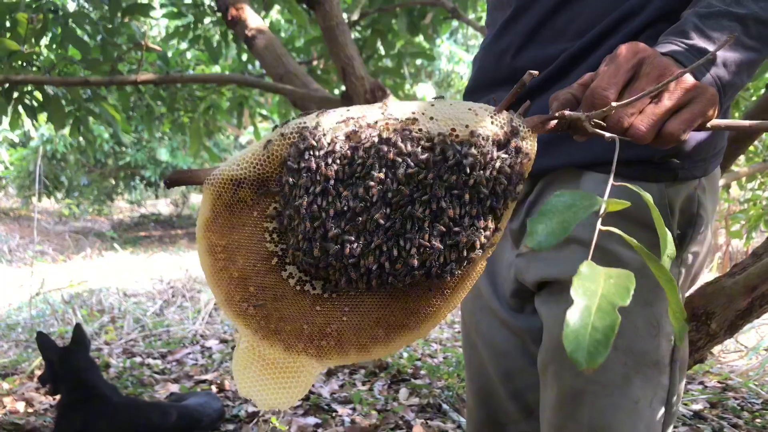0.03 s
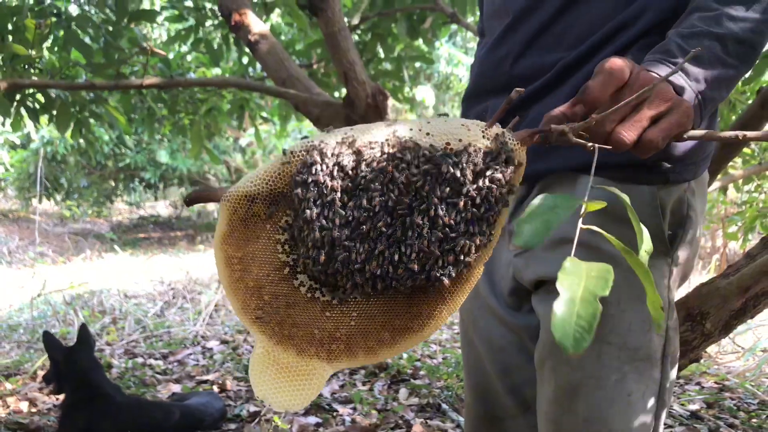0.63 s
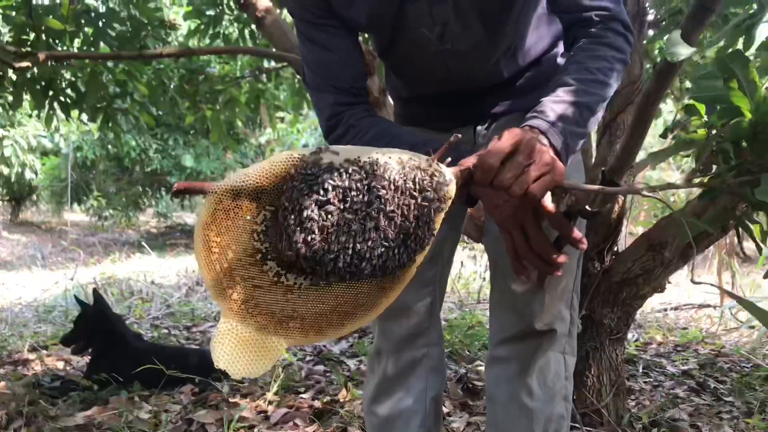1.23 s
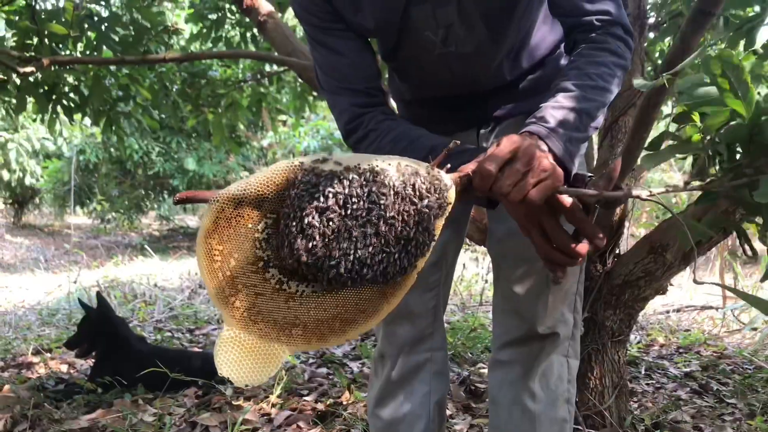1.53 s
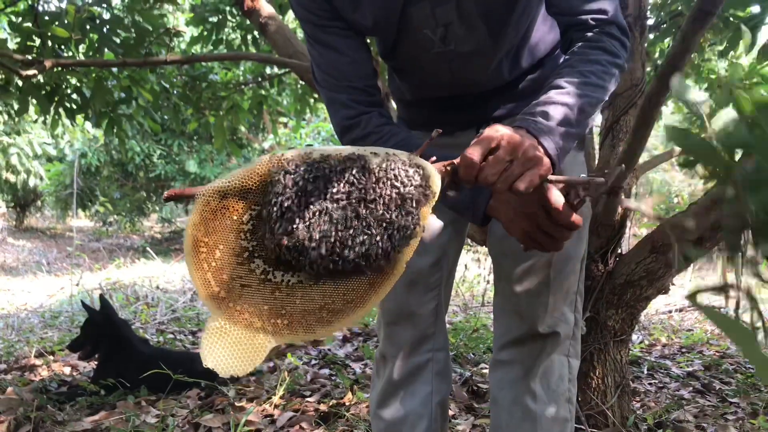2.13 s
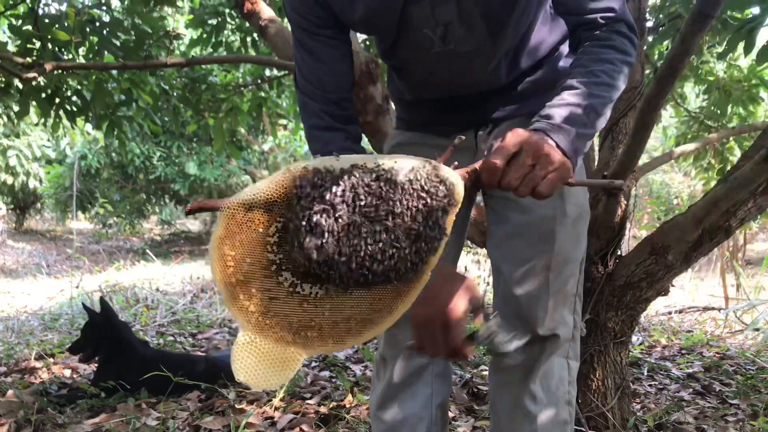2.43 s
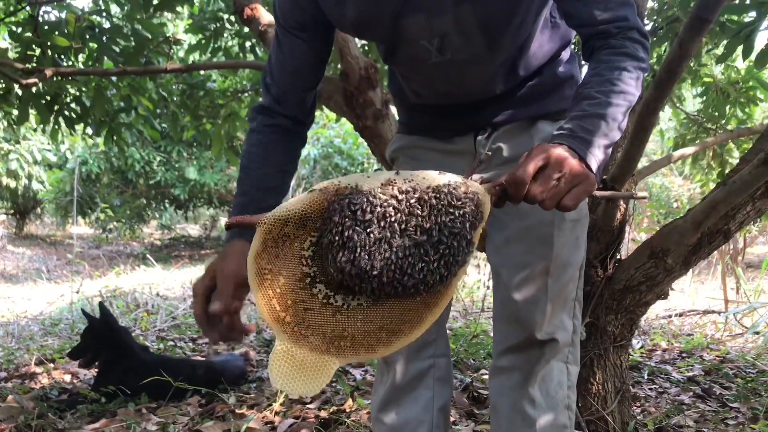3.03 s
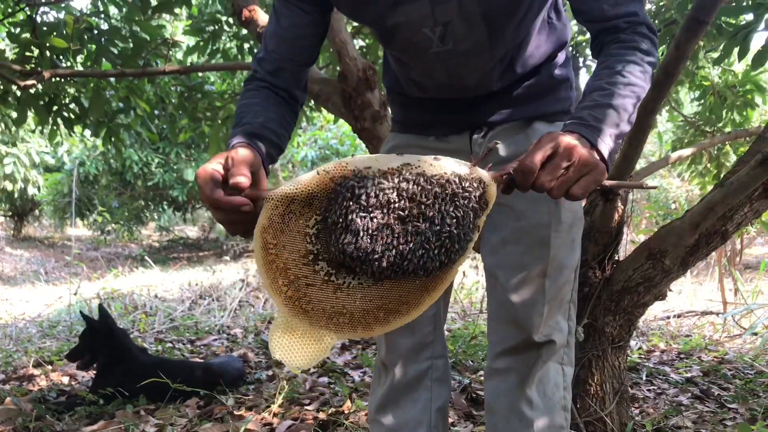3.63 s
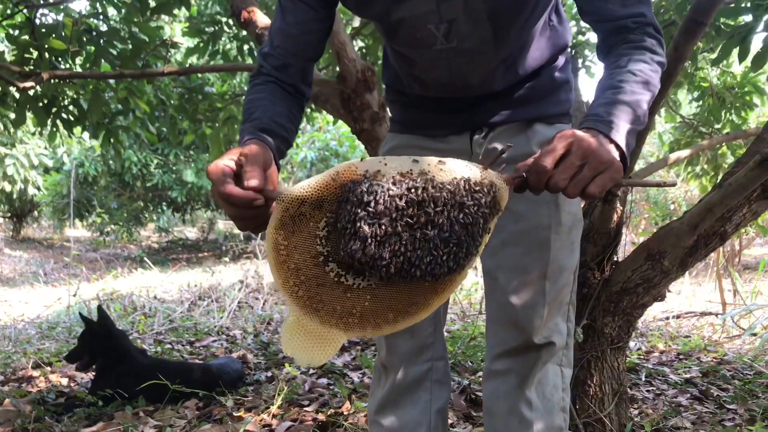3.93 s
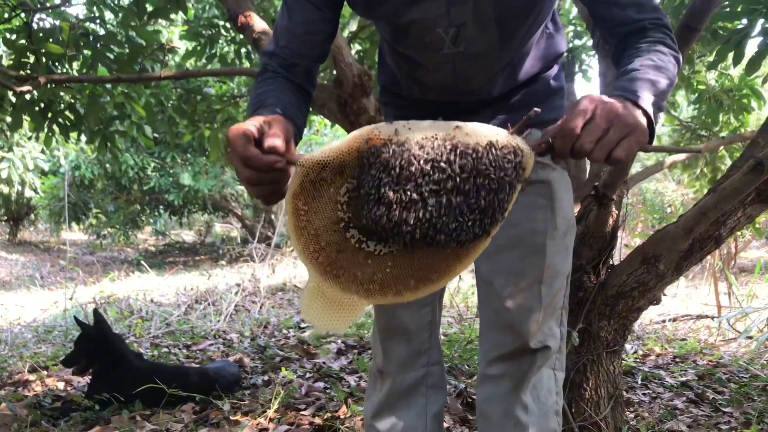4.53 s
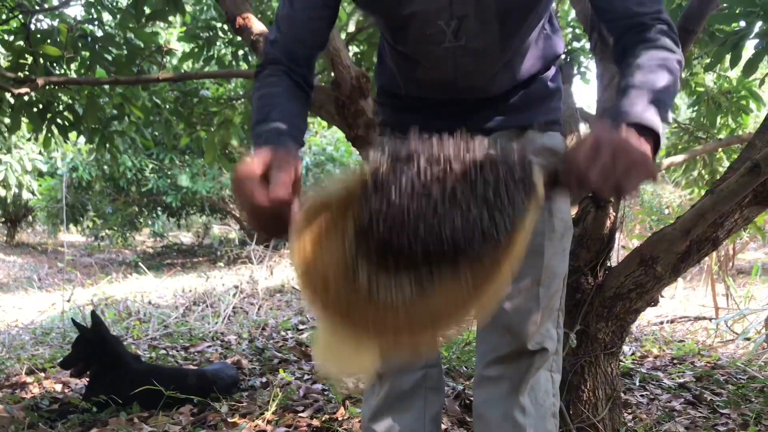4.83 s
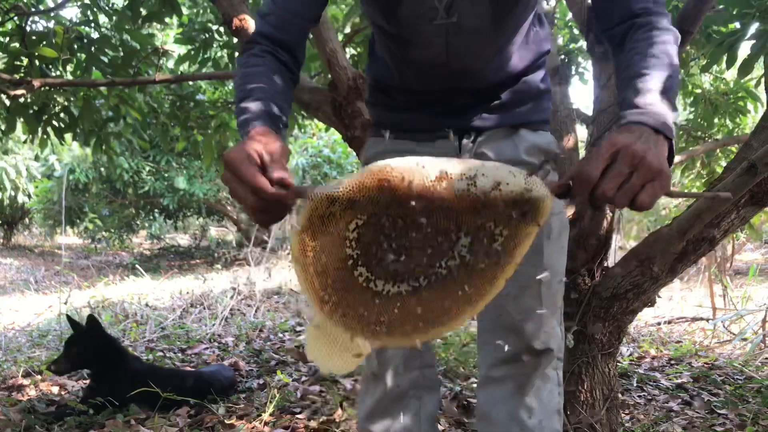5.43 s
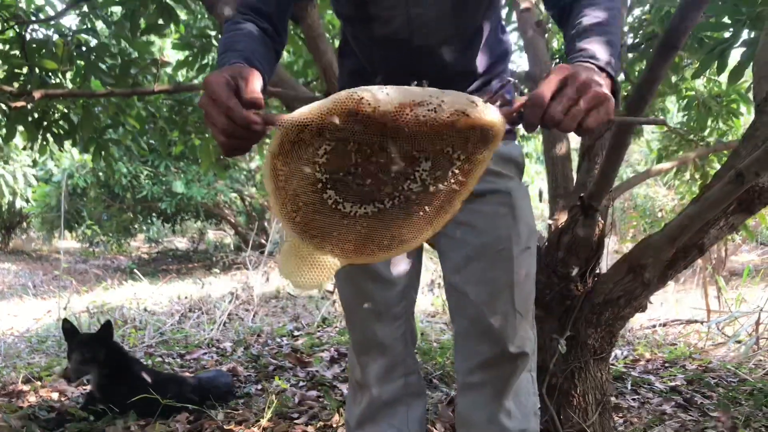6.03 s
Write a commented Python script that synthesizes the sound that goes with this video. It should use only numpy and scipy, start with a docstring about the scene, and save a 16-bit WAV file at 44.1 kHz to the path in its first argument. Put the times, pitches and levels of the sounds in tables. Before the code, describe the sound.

Hands knock a branch and snap twigs, before a clump of bees drops into dry leaves and softly buzzes into the air.

```python
"""Under a tree in a quiet wood, the microphone close to a branch that carries a wild honeycomb.
Over far foliage and a thin hiss, hands rub and knock the branch; a bee drifts past and the sound cuts
out for an instant. Twigs snap and trimmings crunch into dry leaves. Near five seconds one jerk throws
the bees off: the clump crashes into the leaf litter and seethes there, and stragglers patter down
while the swarm takes wing with a soft hum."""
import sys
import numpy as np
from scipy import signal
from scipy.fft import rfft, irfft, next_fast_len
from scipy.io import wavfile
from scipy.ndimage import map_coordinates

SR = 44100
rng = np.random.default_rng(int(sys.argv[2]) if len(sys.argv) > 2 else 0)


def inscribe(sig):
    """Save sig as 16-bit PCM at rate SR to the path in sys.argv[1].

    A 1-D sig is mono; a 2-D sig holds one channel per row.
    Samples are clipped to [-1, 1] before scaling.
    """
    pcm = np.round(np.clip(np.atleast_2d(sig).T, -1, 1) * 32767)
    wavfile.write(sys.argv[1], SR, pcm.astype(np.int16))


N = 277830
TOP_HZ = 15850  # band limit
SHAKE_S, LOOSEN_S = 4.85, .35  # the bees begin to lose their hold; all are off this much later

# spectrum of dry leaf litter: frequency_hz, level_db
LEAF_LITTER = [(35, -52), (60, -27), (406, -13), (780, -10), (940, -10.5), (1060, -8), (1570, -7),
               (2330, -5), (3020, -1.5), (4920, -4), (6220, -2.5), (9680, -5), (10600, -7), (13700, -0.5),
               (15800, -7)]


def amp(db):
    """Decibels to gain."""
    return 10 ** (np.asarray(db) / 20)


def unit(x):
    """Scale to rms 1."""
    return x / np.sqrt(np.mean(x ** 2) + 1e-20)


def along(points, hz):
    """Read (frequency_hz, value) points on a log frequency axis."""
    frequencies, values = np.transpose(points)
    return np.interp(np.log(hz + 1), np.log(frequencies + 1), values)


def wobble(rate, t):
    """A smooth random curve over the times t, rate knots a second."""
    return map_coordinates(rng.standard_normal(400), [t * rate], mode="wrap")


def filtered(x, response):
    """Filter x by a response given as a function of frequency."""
    size = next_fast_len(len(x) + 4096)
    return irfft(rfft(x, size) * response(np.fft.rfftfreq(size, 1 / SR)), size)[:len(x)]


def coloured(x, spectrum):
    """Shape x by a spectrum, at rms 1."""
    return unit(filtered(x, lambda hz: amp(along(spectrum, hz))))


def noise_through(response, t):
    """Filtered white noise over the times t, at rms 1."""
    return unit(filtered(rng.standard_normal(len(t)), response))


def resonance(f, centre, q):
    """Response of a causal band-pass."""
    return 1j * f * centre / q / (centre ** 2 - f ** 2 + 1j * f * centre / q)


def add(track, start_s, sound):
    """Mix a sound into the track."""
    start = max(round(start_s * SR), 0)
    track[start:start + len(sound)] += sound[:max(N - start, 0)]


def stroke(t, length_s, attack_s, release_s):
    """Attack, hold until length_s, then fall 20 dB per release_s."""
    return np.clip(t / attack_s, 0, 1) * amp(-20 * np.maximum(t - length_s, 0) / release_s)


def surge(rise_s, hold_s, decay_s, rest):
    """Activity after the shake: it grows to 1, holds, then dies down to a resting share."""
    t = np.arange(N) / SR - SHAKE_S
    dying = np.exp(-np.maximum(t - rise_s - hold_s, 0) / decay_s)
    return np.clip(t / rise_s, 0, 1) * (rest + (1 - rest) * dying)


def crackle(count, spread_db, life_s):
    """A steady stream of tiny leaf clicks, each with its own pitch and size."""
    when, pitch, size, phase = rng.random((count, 4), dtype=np.float32).T[:, :, None]
    k = np.arange(64, dtype=np.float32)  # samples of one click
    strength = amp(-spread_db * np.log(np.maximum(size, .015)))
    ring = np.sin(2 * np.pi * (pitch * TOP_HZ / SR * k + phase))
    clicks = strength * np.exp(-k / SR / life_s) * ring
    return np.bincount((when * N + k).astype(int).ravel(), clicks.ravel(), N)[:N]


def woodland(foliage_db=-66, stir_db=0.38):
    """Far foliage murmurs over a thin, even hiss."""
    # spectra of the foliage and of the hiss: frequency_hz, level_db
    foliage_spectrum = [(20, -23), (55, 0.5), (100, -5.5), (200, -5), (255, -8.5), (335, 2), (420, -1),
                        (500, -5.5), (600, -3), (720, -4.5), (1000, -0.5), (2400, -10.5), (5500, -17),
                        (9000, -41)]
    hiss_spectrum = [(2000, -9), (5000, -12), (6200, -3.5), (7600, -10), (9000, -3.5), (10400, -9.5),
                     (12000, -2), (14000, -0.5), (15800, -2.5)]
    # course of the hiss: time_s, level_db
    hiss_levels = [(0, -66), (.6, -67), (2, -67.5), (6.3, -68)]
    t = np.arange(N) / SR
    sway = amp(foliage_db + stir_db * wobble(4.7, t))
    foliage = sway * coloured(rng.standard_normal(N), foliage_spectrum)
    hiss_db = np.interp(t, *np.transpose(hiss_levels))
    return foliage + amp(hiss_db) * coloured(rng.standard_normal(N), hiss_spectrum)


def stirring(rustle_db=-76, tick_db=-84):
    """Close by, bark, sleeves and leaves underfoot keep up a faint rustle with a few stray ticks."""
    rustle = coloured(crackle(count=4000, spread_db=3, life_s=.0003), LEAF_LITTER)
    ticks = coloured(crackle(count=30, spread_db=3.5, life_s=0.00081), LEAF_LITTER)
    return amp(rustle_db + 0.85 * wobble(4.11, np.arange(N) / SR)) * rustle + amp(tick_db) * ticks


def handling(thump_gain_db=-1, rub_gain_db=-1.5, sag_db_per_s=37):
    """Hands bump and rub; each rub is strongest as the grip first slips."""
    # dull thumps of hands and of falling weight: start_s, relative_db, pitch_hz, t60_s
    thumps = [(1.035, -45.5, 149, 0.24), (1.116, -48.5, 109, 0.22), (3.07, -52, 240, 0.21),
              (3.6, -59, 55, .09), (4.268, -52, 44, 0.11), (5.114, -50, 76, 0.087)]
    # hands shifting their grip: start_s, relative_db, length_s
    rubs = [(0.039, -52, 0.29), (0.388, -58.5, .13), (1.032, -58.5, 0.17), (3.57, -68, .15)]
    # spectrum of the slipping grip: frequency_hz, level_db
    grip_spectrum = [(40, -6), (100, -10), (150, 3), (300, -3), (450, -6), (650, -11), (1000, -15.5),
                     (2000, -31)]
    out, t = np.zeros(N), np.arange(SR // 2) / SR
    for start_s, db, hz, t60 in thumps:
        body = noise_through(lambda f: resonance(f, hz, q=1.35) ** 2, t)
        add(out, start_s, amp(db + thump_gain_db - 60 * t / t60) * body * (1 - np.exp(-t / .0007)))
    for start_s, db, length_s in rubs:
        skin = coloured(rng.standard_normal(len(t)), grip_spectrum)
        slip = stroke(t, length_s, attack_s=0.0027, release_s=0.078)
        add(out, start_s, amp(db + rub_gain_db - sag_db_per_s * t) * slip * skin)
    return out


def branch_knocks(ring_q=3.1, attack_s=0.0019):
    """The branch, damped by the hand, rings briefly; a harder knock favours its upper modes."""
    # knocks on the branch: start_s, level_db, hardness_db_per_octave
    knocks = [(.045, -42, -3.5), (.072, -43, -2), (.106, -51, -3), (2.104, -46, 6.5), (4.9626, -38, 5.5)]
    # modes of the held branch: pitch_hz, relative_db, t60_s
    modes = [(261, -6.5, 0.055), (613, 0, 0.044), (910, -6, 0.039), (1450, -7.5, .04), (2750, -14, 0.034)]
    main_mode_hz = modes[1][0]
    out, t = np.zeros(N), np.arange(SR // 4) / SR
    for start_s, db, hardness in knocks:
        for hz, mode_db, t60 in modes:
            ring = noise_through(lambda f: resonance(f, hz, ring_q) ** 2, t)
            level_db = db + mode_db + hardness * np.log2(hz / main_mode_hz)
            add(out, start_s, amp(level_db - 60 * t / t60) * ring * (1 - np.exp(-t / attack_s)))
    return out


def snaps(gain_db=-8, t60_s=0.008, tail_db=-14, tail_t60_s=0.059, crack_db=-11, edge_db=7):
    """A fracture or strike is a short burst that rings its twig or leaf, with a bright edge."""
    # twigs snapping, bark ticking, single bees hitting leaves: start_s, relative_db, pitch_hz, bright_db
    strikes = [(0.5195, -46.5, 2540, -27), (.6818, -46, 4060, -20), (1.1235, -32.5, 6430, -8),
               (1.4024, -39.5, 4520, -14), (1.4074, -39, 4700, -8), (1.4192, -39.5, 4610, -1),
               (1.6075, -36, 8700, -27), (2.1036, -16, 6300, -11), (2.1097, -18.5, 4100, -12),
               (2.2323, -41, 2870, -12), (2.4641, -9.5, 5700, -21), (2.7631, -36.5, 6790, -17),
               (2.8126, -35.5, 4310, -12), (3.144, -35, 3590, -15), (3.2335, -33.5, 2860, -18),
               (3.3328, -35.5, 4600, -9), (3.3413, -35.5, 4700, -18), (3.7374, -47.5, 4460, -21),
               (4.6773, -44.5, 3450, -23), (5.4814, -31, 4440, -10), (5.5864, -27, 4250, -16),
               (6.0008, -38.5, 5200, -14), (6.102, -29, 8450, -9), (6.244, -39, 4350, -17)]
    out, t = np.zeros(N), np.arange(SR // 20) / SR
    fading = amp(-60 * t / t60_s) + amp(tail_db - 60 * t / tail_t60_s)
    for start_s, db, hz, bright_db in strikes:
        colour = lambda f: (resonance(f, hz, q=3.5)
                            + amp(crack_db) * resonance(f, 3860, q=.8) ** 2
                            + amp(bright_db + edge_db) * resonance(f, 12000, q=2.7))
        add(out, start_s + .0005, noise_through(colour, t) * amp(db + gain_db) * fading)
    return out


def swarm(count=30, calm_db=-83, alarm_db=-57.5, wingbeat_hz=192.6, alarm_rise_hz=29.03, swell_s=0.057):
    """Each bee sends one air pulse per wingbeat; alarm lifts the hum's level and pitch, then both sag."""
    # spectra of the wing pulses and of the air they stir: frequency_hz, level_db
    wing_spectrum = [(80, -20), (140, -6.5), (215, -12), (300, -1), (420, -0.5), (600, -3), (800, -9),
                     (1000, -6), (1500, -13.5), (4000, -39)]
    wash_spectrum = [(60, -27), (110, -9), (160, -0.5), (220, -5), (400, -7), (900, -28)]
    # brief swells of low hum (bees passing; at 3.66 s a hand shifting its grip): peak_s, level_db
    swells = [(.7, -70), (3.66, -67.5), (5.97, -66)]
    t = np.arange(N) / SR
    level = amp(calm_db) + amp(alarm_db) * surge(LOOSEN_S, hold_s=0.36, decay_s=0.79, rest=0.21)
    level += sum(amp(db) / (1 + ((t - peak_s) / swell_s) ** 2) for peak_s, db in swells)
    beat_hz = wingbeat_hz + alarm_rise_hz * surge(LOOSEN_S, hold_s=.08, decay_s=.5, rest=0)
    beat_hz *= np.exp(.015 * wobble(7, t))  # the whole hum wavers
    step = 100  # samples between pitch updates
    coarse_t, pulses = t[::step], np.zeros(N)
    for rank in np.linspace(0, 1, count):
        detune = .033 * (1 - 2 * rank) - .24 * rank ** 4  # most beat near one rate, a few trail below
        pitch_hz = beat_hz[::step] * np.exp(detune + .036 * wobble(13, coarse_t))
        cycles = rng.random() + np.cumsum(pitch_hz) * step / SR
        beats_s = np.interp(np.arange(2, cycles[-1]), cycles, coarse_t)
        swerve_db = 4 * wobble(9, beats_s)  # louder as the bee swerves close
        pulses += np.bincount((beats_s * SR).astype(int), amp(swerve_db), N)
    wash_db = -9 + 2.5 * wobble(10, t)  # stirred air flutters under the tone
    wash = amp(wash_db) * coloured(rng.standard_normal(N), wash_spectrum)
    return level * (coloured(pulses - pulses.mean(), wing_spectrum) + wash)


def leaf_crunches(settle_db=-12, treble_hz=1500):
    """Each touch or landing crushes many dry leaves: a dense crackle swells and settles."""
    # leaves crushed by hands or falling things: start_s, level_db, length_s, treble_db_per_octave
    crunches = [(1.4, -68, 0.053, 6), (1.484, -64.5, 0.054, -3), (1.576, -63.5, 0.074, -2),
                (2.066, -57.5, 0.016, -1.5), (2.079, -51.5, 0.056, 1), (2.102, -37, 0.01, 2.5),
                (2.35, -43, 0.061, 1), (2.402, -33, 0.07, -0.24), (2.639, -53, 0.062, -2),
                (2.808, -49, 0.015, 1), (3.0376, -37, 0.0095, -0.5), (3.049, -29.5, 0.039, 0.2),
                (3.227, -47.5, 0.058, -1), (3.363, -64, 0.058, -0.5), (3.589, -64.5, 0.059, -8),
                (5.085, -25.5, 0.029, 0), (5.286, -44.5, 0.044, 0.5), (6.124, -54, 0.031, -0.5)]
    grains = coloured(crackle(count=36000, spread_db=0.57, life_s=0.00056), LEAF_LITTER)
    out, t = np.zeros(N), np.arange(3 * SR // 4) / SR
    for start_s, db, length_s, tilt in crunches:
        offset = rng.integers(N - len(t))
        treble = lambda hz: amp(tilt * np.log2(np.maximum(hz, treble_hz)))
        leaves = unit(filtered(grains[offset:offset + len(t)], treble))
        attack_s = 0.24 * length_s  # a longer crunch stirs more leaves: slower to swell and to settle
        crush = stroke(t, length_s, attack_s, release_s=0.95 * length_s)
        settle = amp(settle_db) * stroke(t, length_s, attack_s, release_s=3.7 * length_s)
        add(out, start_s, amp(db) * leaves * np.hypot(crush, settle))
    return out


def fallen_bees(seethe_db=-45, patter_db=-54):
    """On the ground, thousands of legs and wings scrape the leaves; late bees hit them one by one."""
    # spectrum of bees scrabbling in leaves: frequency_hz, level_db
    scrabble_spectrum = [(410, -25), (700, -8.5), (1120, -5.5), (2150, -7.5), (3530, -4.5), (5020, -6),
                         (5860, -4), (7710, -7), (9020, -4), (10400, -7), (14100, -0.5), (15000, -0.5),
                         (15800, -14)]
    legs = coloured(crackle(count=50000, spread_db=0.5, life_s=0.00033), scrabble_spectrum)
    landings = coloured(crackle(count=4000, spread_db=3, life_s=0.0003), LEAF_LITTER)
    return (amp(seethe_db) * surge(LOOSEN_S, hold_s=0.16, decay_s=0.34, rest=.18) * legs
            + amp(patter_db) * surge(rise_s=0.56, hold_s=0.091, decay_s=0.076, rest=0.19) * landings)


def among_trees(x, ground_db=-13, ground_delay_s=.0031, echo_db=-22):
    """The ground reflects a near sound at once; trunks and crowns scatter a faint tail."""
    # decay of the echo among the trees: frequency_hz, t60_s
    echo_decay = [(200, .4), (3000, 1), (14000, 1)]
    hz, t, noise = signal.stft(rng.standard_normal(SR), SR, nperseg=256)
    tail = signal.istft(noise * amp(-60 * t / along(echo_decay, hz)[:, None]), SR, nperseg=256)[1]
    echo = signal.fftconvolve(x, tail / np.linalg.norm(tail))[:N]
    bounce = np.pad(x, (round(ground_delay_s * SR), 0))[:N]
    return x + amp(ground_db) * bounce + amp(echo_db) * echo


def scene():
    """All that reaches one microphone under the tree."""
    near = leaf_crunches() + snaps() + branch_knocks() + stirring() + handling() + fallen_bees()
    return (among_trees(near) + swarm() + woodland())[None]


def record(dry):
    """The sound cuts out for an instant, and nothing passes above the band limit."""
    cut_s, resume_s = .988, 1.034
    t = np.arange(N) / SR
    live = (t < cut_s) | (t > resume_s)
    return filtered(dry[0] * live, lambda hz: hz < TOP_HZ)[None]


dry = scene()
out = record(dry)
inscribe(out)
```